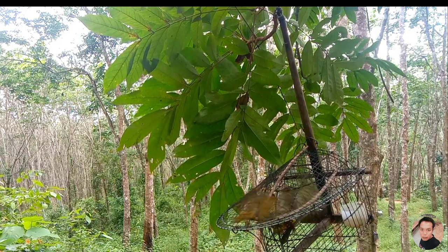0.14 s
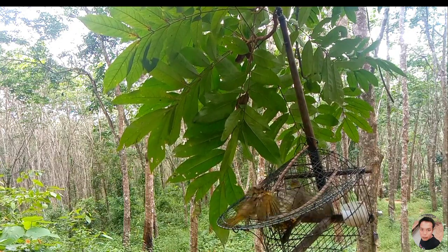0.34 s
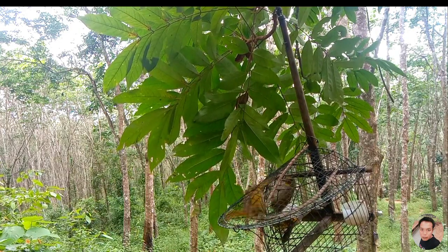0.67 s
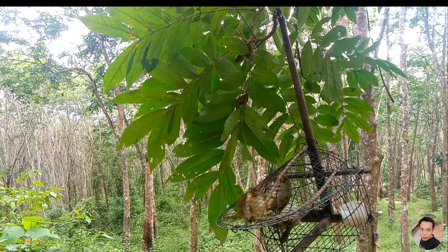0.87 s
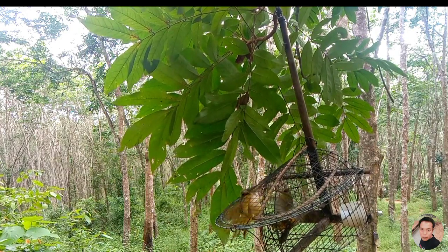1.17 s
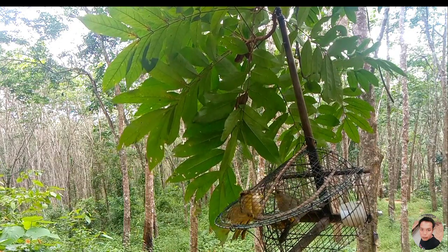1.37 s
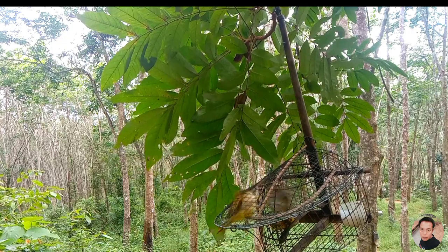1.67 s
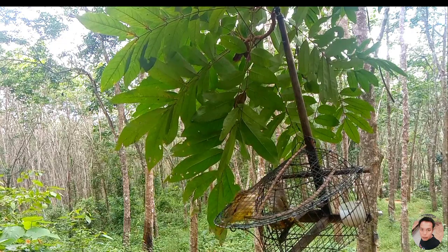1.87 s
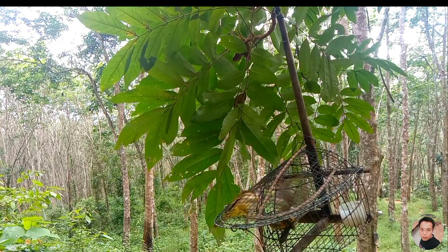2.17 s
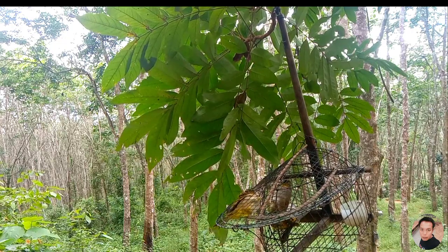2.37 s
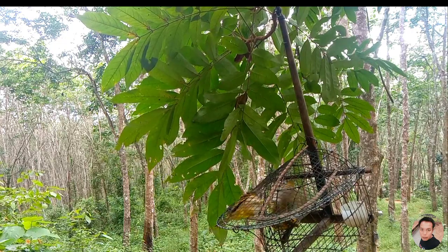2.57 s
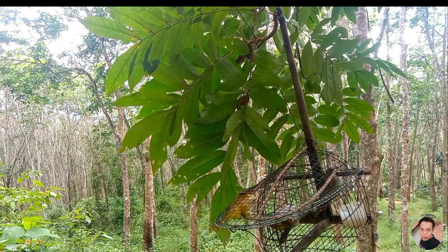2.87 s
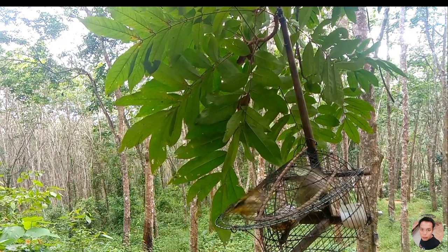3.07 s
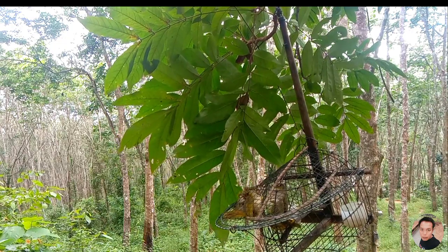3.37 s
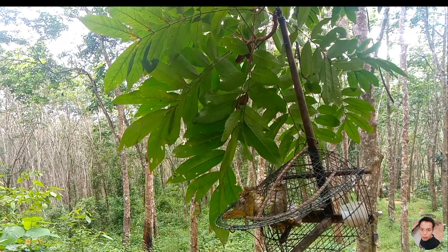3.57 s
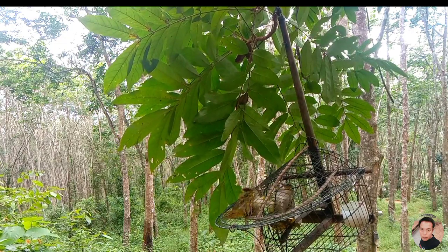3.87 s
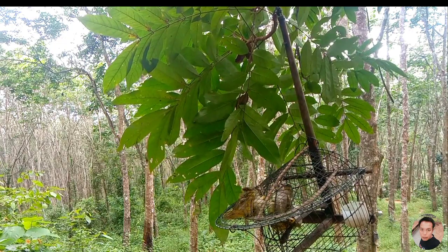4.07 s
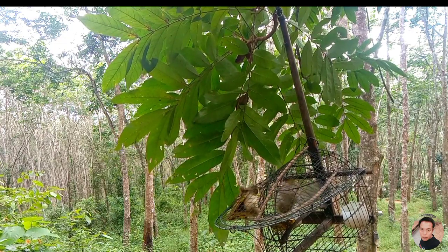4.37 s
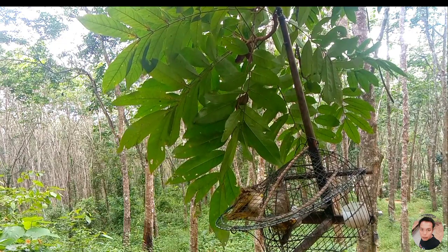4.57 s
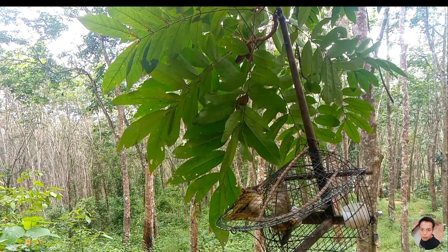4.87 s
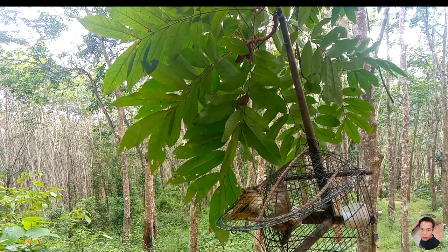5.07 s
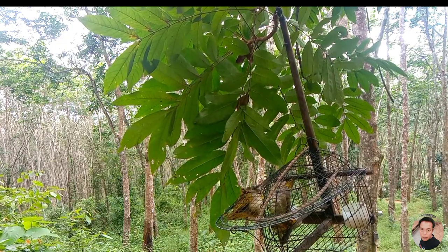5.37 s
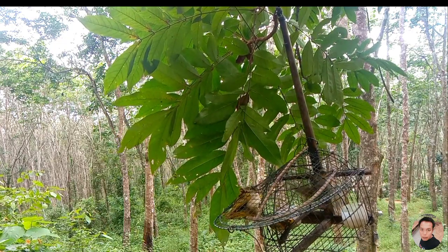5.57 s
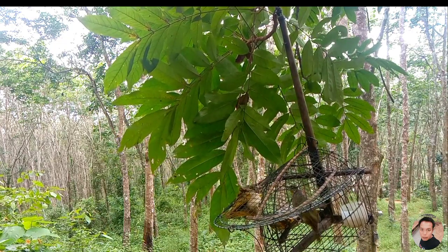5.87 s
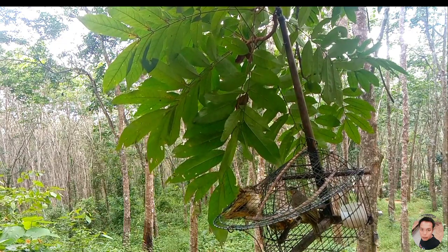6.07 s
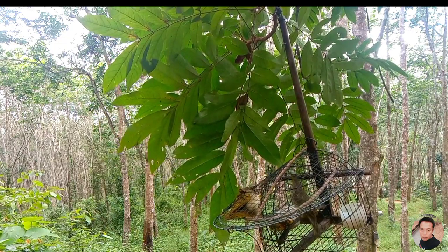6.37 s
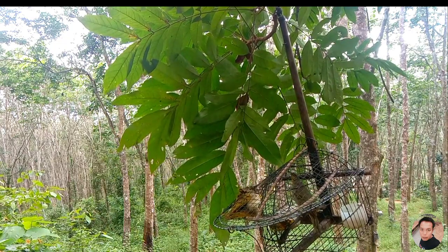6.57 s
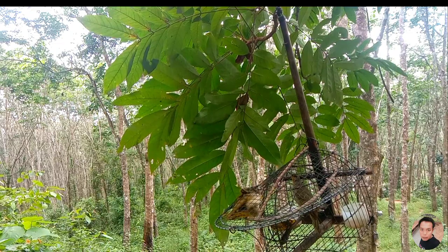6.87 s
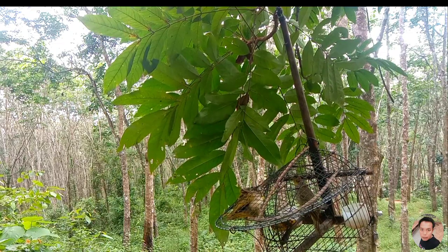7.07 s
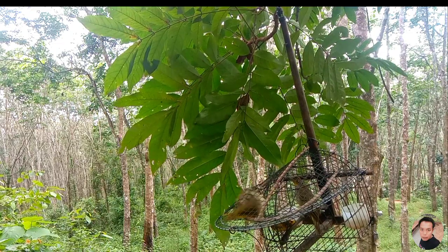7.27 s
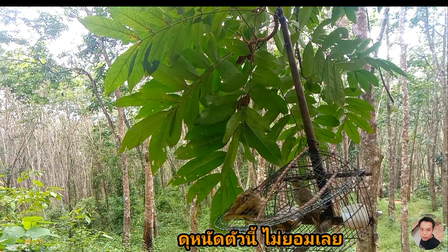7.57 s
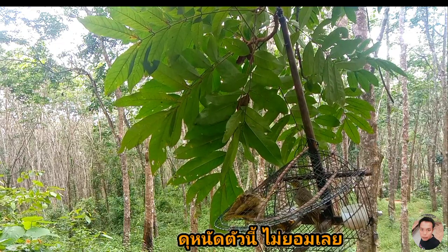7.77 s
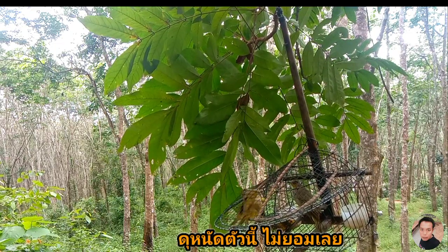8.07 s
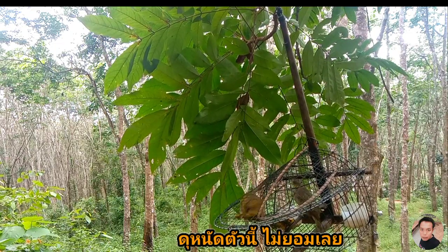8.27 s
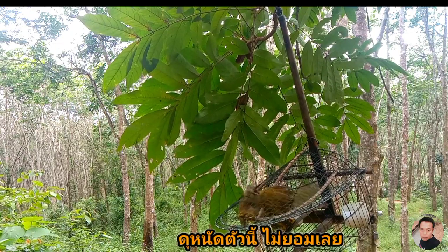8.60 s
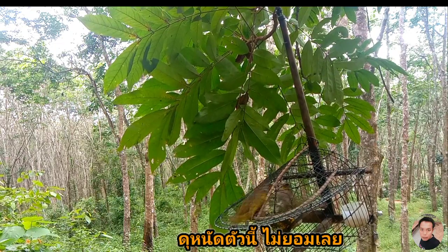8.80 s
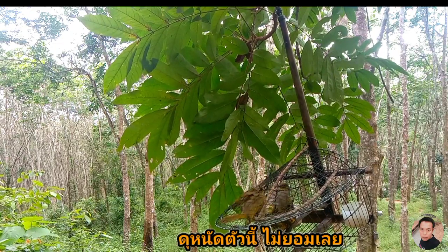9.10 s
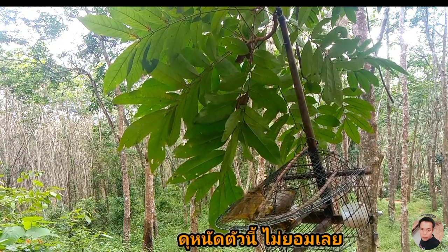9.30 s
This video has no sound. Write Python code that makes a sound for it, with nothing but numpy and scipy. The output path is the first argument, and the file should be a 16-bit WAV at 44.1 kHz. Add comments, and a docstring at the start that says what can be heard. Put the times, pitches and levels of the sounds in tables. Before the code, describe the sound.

Wings batter cage wire in fast dry flurries with clicks and tiny rings, starting at once and breaking into shorter bouts over several seconds. Behind is a quiet wood: steady soft air, a far engine humming low and surging, a steady high cricket, hoarse cicadas coming and going, and a distant hollow two-note bird. After a long lull, another brief scuffle rattles the cage and fades. Single-channel outdoor pickup, cage in front, little reverberation.

```python
"""Wings beat the wire of a cage in gritty bursts and feathers rustle as two birds scuffle in a wood.
Shaped noise makes the feathers; clicks driving damped modes make the wire ring.
Behind them a far engine drones in harmonics, a cricket trills in tone pulses, cicadas buzz as a comb
of lines and as hoarse noise bands, thin insects whistle as narrow-band noise, faint hollow tones flicker
and a distant bird repeats a two-note call of falling sines over the steady air of the wood."""
import sys
import numpy as np
from scipy import signal
from scipy.fft import rfft, irfft
from scipy.io import wavfile

SR = 44100
rng = np.random.default_rng(int(sys.argv[2]) if len(sys.argv) > 2 else 0)


def materialize(psi):
    """Save the field psi as 16-bit PCM at rate SR to the path in sys.argv[1].

    A 1-D psi becomes a single channel; in a 2-D psi each row is a channel.
    """
    bounded = np.clip(np.atleast_2d(psi).T, -1, 1)
    quanta = np.round(bounded * 32767).astype(np.int16)
    wavfile.write(sys.argv[1], SR, quanta)


N = 416304


def from_db(db):
    """Amplitude ratio: 20 dB is a factor of ten."""
    return 10 ** (np.asarray(db) / 20)


def rms_one(x):
    """Normalisation by effective value: the signal is scaled to rms 1."""
    return x / np.sqrt(np.mean(x ** 2) + 1e-20)


def in_time(rows):
    """Linear interpolation: each column after the times in seconds becomes one value a sample."""
    s, *columns = np.transpose(rows)
    return [np.interp(np.arange(N) / SR, s, c) for c in columns]


def coloured(x, spectrum):
    """Minimum-phase filtering: a folded cepstrum gives the spectrum its most compact causal response."""
    hz = np.maximum(np.arange(2049) * SR / 4096, 10)
    at, level_db = np.transpose(spectrum)
    log_gain = np.log(from_db(np.interp(np.log(hz), np.log(at), level_db)))
    cepstrum = irfft(log_gain)
    cepstrum[1:2048] *= 2
    cepstrum[2049:] = 0
    response = irfft(np.exp(rfft(cepstrum)))
    return signal.oaconvolve(x, response)[:N]


def drift(rate_hz):
    """Low-passed chance: two equal poles leave a random wander below the rate, with rms 1."""
    r = np.exp(-2 * np.pi * rate_hz / SR)
    wander = signal.lfilter([1], [1, -2 * r, r * r], rng.standard_normal(N + SR))
    return rms_one(wander[SR:])   # the filter has settled after the first second


def resonance(x, hz, width_hz):
    """Damped resonance: a two-pole band-pass with gain 1 on top."""
    r = np.exp(-np.pi * width_hz / SR)
    zeros = np.array([1, 0, -1]) * (1 - r * r) / 2
    return signal.lfilter(zeros, [1, -2 * r * np.cos(2 * np.pi * hz / SR), r * r], x + 1e-18)


def feather_noise(grit_db):
    """Modulated noise: hiss gritty by the millisecond, in low, middle and treble groups of patchy bands."""
    # Spectrum of the wings. Each row: frequency in Hz, relative level in dB per Hz.
    wing_spectrum = [(60, -18.5), (120, -5.5), (212, -2), (520, 1), (1080, -13), (1270, -1), (2760, -8.5),
                     (3390, -4.5), (4240, -11), (5520, 2), (8130, -3.5), (9380, -5), (13500, -17),
                     (14700, -14.5), (15600, -29)]
    edges_hz = [60, 250, 500, 950, 1450, 2000, 2700, 3500, 4500, 5400, 6400, 7400, 8400, 10000, 12500, 17000]
    patchy_db = 3.5
    grit = from_db(grit_db * drift(370))
    hiss = [coloured(grit * rng.standard_normal(N), wing_spectrum) for _ in range(2)]
    bands = []
    for k, pair in enumerate(zip(edges_hz, edges_hz[1:])):
        band_pass = signal.butter(2, pair, "band", fs=SR, output="sos")
        band = signal.sosfilt(band_pass, hiss[k % 2])   # neighbours take different hiss
        bands.append(from_db(patchy_db * drift(21.7)) * band)
    groups = bands[:3], bands[3:8], bands[8:]
    return np.array([rms_one(sum(group)) for group in groups])


def rustle():
    """Friction noise of feathers: soft patches between the beats; the softer, the duller."""
    # Feathers brushing. Each row: time in seconds, treble level in dB.
    brushing = [(0.0, -56), (0.4, -60), (0.47, -53), (0.63, -57), (0.89, -59), (1.13, -73), (1.29, -56.5),
                (1.52, -68), (1.81, -75), (2.1, -69), (2.39, -76.5), (3.23, -73.5), (3.39, -75.5),
                (5.39, -85), (5.81, -63), (6.02, -80.5), (8.55, -79), (8.7, -69), (9.1, -74), (9.44, -72.5)]
    loud_db, middle_db_when_loud, low_over_treble_db = -56, 3.5, 2
    dulling = 0.19   # dB the middle gains over the treble for each dB of softening
    treble_db, = in_time(brushing)
    middle_db = treble_db + middle_db_when_loud + dulling * (loud_db - treble_db)
    levels = from_db([treble_db + low_over_treble_db, middle_db, treble_db])
    return (levels * feather_noise(grit_db=0.5)).sum(axis=0)


def wing_beats():
    """Impact and friction: each beat swells into a burst of feather noise and rattles the wire with ticks."""
    # Beats on the wire. Each row: peak time in seconds, middle level in dB, low level in dB re middle,
    # treble level in dB re middle, rise in seconds, 60 dB decay time in seconds.
    beats = [(0.026, -52, -9, 6.5, 0.016, 0.03), (0.079, -41.5, -3.5, 0.5, 0.012, 0.036),
             (0.23, -35.5, -15, 2, 0.0076, 0.052), (0.256, -38, -8, 1, 0.011, 0.083),
             (0.311, -40, -4.5, 2, 0.021, 0.12), (0.375, -42.5, -6, 3, 0.011, 0.054),
             (0.44, -35, -7.5, -4, 0.014, 0.043), (0.486, -34.5, -8, -5, 0.021, 0.033),
             (0.545, -32.5, -10, 0, 0.01, 0.031), (0.601, -31.5, -1.5, -3, 0.013, 0.024),
             (0.649, -33.5, -36, -2, 0.015, 0.057), (0.693, -40, -2, -2.5, 0.015, 0.051),
             (0.79, -68, -10, 18.5, 0.0049, 0.11), (0.851, -37, 1, -2.5, 0.0022, 0.024),
             (0.884, -46.5, -15, 4, 0.011, 0.077), (0.93, -52, -22, 2.5, 0.0073, 0.11),
             (1.105, -46.5, -22, -0.5, 0.046, 0.054), (1.118, -35, -15, -2, 0.0064, 0.043),
             (1.14, -32.5, -7.5, -1.5, 0.0041, 0.037), (1.162, -43.5, -11, 1, 0.012, 0.19),
             (1.248, -38, -6, 5.5, 0.024, 0.053), (1.28, -39.5, -24, 1, 0.0098, 0.037),
             (1.334, -31, -7, 1, 0.017, 0.03), (1.343, -33, 1, 1, 0.005, 0.035),
             (1.376, -30, -4, 0.5, 0.013, 0.083), (1.433, -36.5, -8, 1, 0.02, 0.083),
             (1.478, -33.5, -26, 0.5, 0.011, 0.042), (1.619, -50, -27, -2.5, 0.033, 0.13),
             (1.744, -53.5, -15, 1.5, 0.0029, 0.082), (1.8, -37.5, -9, 2, 0.017, 0.052),
             (2.041, -57, -24, 1, 0.038, 0.073), (2.108, -53.5, -22, 9, 0.0042, 0.066),
             (2.24, -49.5, -2.5, 0.5, 0.0056, 0.16), (2.288, -40, -1, 2, 0.015, 0.074),
             (2.372, -52.5, -9, -5, 0.024, 0.13), (2.734, -46, -4, -1.5, 0.0047, 0.071),
             (2.802, -37, -2, 1, 0.0052, 0.11), (2.849, -32.5, -8, -3.5, 0.005, 0.054),
             (2.905, -36, -4.5, -1.5, 0.016, 0.041), (3.079, -76.5, -9, 11.5, 0.0044, 0.34),
             (3.185, -36.5, -11, -0.5, 0.013, 0.069), (3.242, -36, -6, 1.5, 0.015, 0.08),
             (3.282, -26, -1, -1, 0.0045, 0.032), (3.307, -44, -13, 3, 0.013, 0.058),
             (3.34, -40, -15, 2.5, 0.02, 0.073), (3.814, -57.5, -13, -16, 0.0066, 0.087),
             (3.942, -62.5, -14, -3, 0.017, 0.2), (4.388, -62, -9, 7, 0.012, 0.18),
             (4.441, -41.5, -5, -1.5, 0.019, 0.044), (4.509, -40, -5, 2.5, 0.0057, 0.086),
             (5.623, -57, 0, 5, 0.0029, 0.071), (5.68, -55, -2.5, -6, 0.024, 0.1),
             (5.71, -38, -6, 1.5, 0.0044, 0.053), (5.782, -43.5, -24, 1, 0.0057, 0.032),
             (5.797, -38.5, -3, 5.5, 0.0033, 0.04), (5.872, -56.5, -25, -1, 0.0023, 0.056),
             (5.95, -59, -32, 0.5, 0.0026, 0.044), (6.577, -74, -23, 4, 0.05, 0.13),
             (7.454, -69, 0, 2.5, 0.048, 0.14), (7.529, -66, -5, 1, 0.0033, 0.063),
             (8.311, -61.5, -19, 1.5, 0.013, 0.16), (8.388, -65.5, -16, -3, 0.0038, 0.2),
             (8.55, -37.5, 3.5, 0, 0.0049, 0.024), (8.565, -37.5, -1, 0.5, 0.0093, 0.068),
             (8.618, -50, -4, 1, 0.023, 0.035), (8.641, -45, -3, 2, 0.019, 0.032),
             (8.655, -42.5, -4.5, -2, 0.014, 0.057), (8.701, -39.5, -8, -0.5, 0.015, 0.04),
             (8.774, -43, -8, -2.5, 0.011, 0.095), (8.832, -46.5, 0, -1, 0.028, 0.033),
             (8.835, -37.5, -12, 2, 0.0043, 0.041), (8.871, -52, -2, -4, 0.0036, 0.062),
             (8.946, -48.5, -28, -4, 0.0064, 0.096), (9.04, -58.5, -15, -7, 0.034, 0.16),
             (9.066, -51.5, -27, -15, 0.0042, 0.02), (9.114, -56, -15, -3, 0.0047, 0.094),
             (9.274, -56.5, -16, -5.5, 0.032, 0.096), (9.296, -66.5, -3, 9, 0.0074, 0.057)]
    # The clearest ticks of claws and quills on the wire. Each row: peak time in seconds, click level in dB,
    # frequency in Hz near which the wire rings most.
    ticks = [(0.029, -35, 1940), (0.0797, -27, 1260), (0.234, -14, 1520), (0.259, -19, 3400),
             (0.311, -22, 1900), (0.374, -31, 1910), (0.438, -30, 3710), (0.468, -17.5, 5400),
             (0.486, -14, 1300), (0.5417, -23, 1740), (0.5478, -14, 1290), (0.6018, -16.5, 1260),
             (0.649, -18.5, 1650), (0.6919, -18.5, 1480), (0.852, -13, 3990), (0.929, -22, 5620),
             (1.1191, -20.5, 1940), (1.1402, -10.5, 1260), (1.236, -25, 3670), (1.2437, -19, 1780),
             (1.2814, -38, 1710), (1.326, -28, 1750), (1.3458, -16, 3400), (1.3734, -14, 1760),
             (1.3965, -22, 7000), (1.4341, -20, 1640), (1.4809, -17.5, 3860), (1.6203, -37, 2280),
             (1.7468, -39, 2330), (1.801, -20, 1340), (2.108, -31.5, 5360), (2.2423, -36, 2360),
             (2.2911, -20, 1660), (2.7353, -22.5, 1690), (2.7994, -22.5, 1910), (2.8514, -11, 1280),
             (2.901, -29, 1700), (3.1856, -22.5, 1520), (3.242, -20, 5400), (3.281, -5, 1270),
             (3.3494, -28, 5400), (3.8154, -37, 2650), (3.9402, -40, 1910), (4.4428, -21, 1260),
             (4.508, -16.5, 1305), (5.621, -44, 5570), (5.7076, -18, 1640), (5.7755, -29, 7000),
             (5.7813, -23, 1290), (5.7963, -22.5, 5400), (5.871, -36.5, 1700), (5.9465, -37.5, 2300),
             (8.5194, -37.5, 5790), (8.5496, -10.5, 1260), (8.5636, -25, 5400), (8.641, -25, 1280),
             (8.6925, -19.5, 1260), (8.7742, -25.5, 1680), (8.8182, -26, 1490), (8.8364, -16.5, 1860),
             (8.9462, -42, 2220), (9.067, -45, 1880), (9.1135, -33, 2960), (9.2953, -37, 3400)]
    loose_per_s, loose_db = 230, -3   # small ticks within a beat
    power, t = np.zeros((3, N)), np.arange(N) / SR
    for s, middle_db, low_db, treble_db, rise, t60 in beats:
        span = slice(max(round((s - rise) * SR), 0), round((s + 0.22) * SR))
        late = t[span] - s
        swell = np.cos(np.pi / 2 * np.clip(late / rise, -1, 0)) ** 1.3
        decay = from_db(-60 * (np.maximum(late, 0) / t60) ** 1.49)
        group_db = middle_db + np.array([[low_db], [0], [treble_db]])
        power[:, span] += (from_db(group_db) * swell * decay) ** 2
    envelope = np.sqrt(power)
    loose_sizes = from_db(5.2 * np.minimum(rng.exponential(1, N), 4)) * rng.choice([-1, 1], N)
    loose = loose_sizes * (rng.random(N) < loose_per_s / SR)
    clicks = from_db(loose_db) * envelope[1] * loose
    favoured_hz = 1200 * 2 ** rng.uniform(0, 2.8, N)
    for s, click_db, hz in ticks:
        i = round((s - .0003) * SR)   # the click comes just ahead of the peak
        clicks[i], favoured_hz[i] = from_db(click_db), hz
    feathers = feather_noise(grit_db=2.8)
    return (envelope * feathers).sum(axis=0) + wire(clicks, favoured_hz)


def wire(clicks, favoured_hz):
    """Modal synthesis: a click cracks and rings one of three bars, most in modes near its favoured pitch."""
    # Short rings of the cage wire. Each row: frequency in Hz before a bar's tuning,
    # level in dB before chance and loss, 60 dB decay time in seconds.
    modes = [(430, 1.5, 0.016), (836, -15, 0.036), (1262, -13, 0.044), (1760, -4.5, 0.021),
             (1980, -1.5, 0.012), (2300, -4, 0.014), (3490, -6.5, 0.015), (3800, -7, 0.022),
             (5420, 1.5, 0.0042), (5260, -7, 0.0089), (7200, 1.5, 0.0076), (9400, -9, 0.017),
             (10800, -8.5, 0.03)]
    off_pitch_db_per_octave = 13   # loss of modes far from the favoured pitch
    crack_spectrum = [(300, -16.0), (1500, -16), (3500, 5), (7000, 1), (15000, -20)]   # (Hz, dB)
    out = from_db(-10) * coloured(clicks, crack_spectrum)
    at = np.flatnonzero(clicks)
    draws = rng.normal(0, 1, (len(at), len(modes) + 1))
    bar = np.digitize(draws[:, -1], [-.43, .43])   # three about equally likely bars
    for (hz, db, t60), chance in zip(modes, draws.T):
        loss_db = off_pitch_db_per_octave * np.abs(np.log2(hz / favoured_hz[at]))
        strength = clicks[at] * from_db(db - 8.5 + 3.7 * np.minimum(chance, 1) - loss_db)
        for k, tuning in enumerate([.97, 1, 1.04]):
            struck = np.zeros(N)
            struck[at] = (bar == k) * strength
            r, w = from_db(-60 / (t60 * SR)), 2 * np.pi * hz * tuning / SR
            out += signal.lfilter([0, np.sin(w)], [1, -2 * r * np.cos(w), r * r], struck + 1e-18)
    return out


def engine():
    """Harmonic synthesis: low orders of the firing cycle, each swelling with load and wavering by itself."""
    # Light running. Each row: time in seconds, cycle frequency in Hz, load level in dB between surges.
    light_running = [(0.0, 32.8, -48), (0.23, 30.87, -57), (1.0, 31.76, -49.5), (1.37, 30.86, -54),
                     (1.57, 32.05, -68), (2.39, 31.65, -56.5), (2.6, 35.1, -59), (3.21, 34.34, -58.5),
                     (3.55, 36.1, -62), (4.13, 35.14, -63.5), (4.31, 36.3, -62.5), (4.57, 34.6, -65),
                     (6.78, 35.87, -62.5), (7.86, 35.7, -59.5), (8.47, 37.54, -69.5), (8.57, 35.9, -60.5),
                     (9.25, 37.7, -70.5), (9.44, 37.7, -64)]
    # Surges under load, swelling slowly and cut off short. Each row: start in seconds, end in seconds,
    # load level in dB before the rise and fade.
    surges = [(0.073, 1.03, -43.5), (1.02, 1.7, -44), (1.775, 2.13, -46.5), (2.203, 2.441, -41),
              (3.102, 3.36, -48.5), (4.79, 5.05, -47.5), (5.305, 5.503, -54), (6.05, 6.25, -54),
              (6.804, 7.083, -48.5), (7.1, 8.054, -59), (8.55, 8.837, -66)]
    # Each row: order, level in dB at the light load, share of the swell under load, unsteadiness in dB.
    orders = [(2, -69, 0.039, 5), (3, -61, 1.0, 2), (4, -66.5, 0.6, 2.5), (5, -76.5, 0.82, 2.5),
              (6, -92, 0.91, 7)]
    light_load_db = -62
    rise_s, cut_s, fade_db_per_s = 0.24, 0.051, 4
    hz, between_db = in_time(light_running)
    t, load = np.arange(N) / SR, from_db(between_db)
    for start, end, db in surges:
        gate = np.clip((t - start) / rise_s, 0, 1) * np.clip((end - t) / cut_s, 0, 1)
        load = np.hypot(load, gate * from_db(db - fade_db_per_s * (t - start)))
    phase = 2 * np.pi * np.cumsum(hz + 0.21 * drift(4.5)) / SR
    out = np.zeros(N)
    for k, db, share, unsteady_db in orders:
        level = np.sqrt(2) * from_db(db + unsteady_db * drift(8.0))   # rms to peak of a sine
        swell = (load / from_db(light_load_db)) ** share
        out += level * swell * np.sin(round(k) * phase + rng.uniform(0, 2 * np.pi))
    return out


def cricket(level_db, hz, per_s):
    """Pulsed tone: a steady train of short sine pulses; now and then one is much fainter."""
    faint_share, faint_gain = .045, .15
    at = np.arange(.0105, N / SR, 1 / per_s)
    sizes = from_db(rng.normal(0, 1.5, 700)[:len(at)])
    sizes[rng.random(700)[:len(at)] < faint_share] = faint_gain
    train = np.zeros(N)
    train[(at * SR).astype(int)] = sizes
    t = np.arange(round(0.014 * SR)) / SR
    pulse = np.hanning(len(t)) * np.sin(2 * np.pi * (hz * t - 9000 * t * t))   # the pitch sags in each pulse
    return from_db(level_db) * rms_one(signal.oaconvolve(train, pulse)[:N])


def cicada_chorus():
    """Incoherent sum: many far insects blur to two hoarse noise bands of drifting resonant strands."""
    # Far chorus. Each row: time in seconds, low-band level in dB, high-band level in dB.
    band_levels = [(0, -68, -66), (2.0, -73, -85), (3.5, -75, -84), (3.7, -75, -86.5), (5.5, -70, -74),
                   (5.8, -63.5, -63), (6.3, -69.5, -90), (6.499, -79, -93), (6.95, -76, -70),
                   (7.2, -73, -80), (8.4, -78.5, -86), (8.9, -65, -63), (9.44, -79, -92)]
    wavering_db, spread_hz, strand_width_hz = 2, 700, 280
    out = np.zeros(N)
    for band_db, hz in zip(in_time(band_levels), (4300, 5400)):
        white = rng.standard_normal(N)
        strands = np.zeros(N)
        for step in (-0.39, -0.012, 0.126, 0.634):
            strand_hz = hz + step * spread_hz
            strand = resonance(resonance(white, strand_hz, strand_width_hz), strand_hz, strand_width_hz)
            strands += from_db(2.8 * drift(4.0)) * strand
        out += from_db(band_db + wavering_db * drift(8.3)) * rms_one(strands)
    return out


def air():
    """Broadband background: steady coloured noise of the wood, its level wandering slightly."""
    # The wood's steady air. Each row: frequency in Hz, relative level in dB per Hz.
    air_spectrum = [(25, -8), (52, -20.5), (110, -9.5), (253, -16.5), (950, -21.5), (2570, -30),
                    (4400, -39.5), (6240, -49.5), (7600, -21.5), (8400, -32), (9400, -31.5), (11000, -42.5),
                    (12000, -45), (13800, -53), (15600, -56)]
    level_db = -67.5 + 0.29 * drift(15.0)
    return from_db(level_db) * rms_one(coloured(rng.standard_normal(N), air_spectrum))


def hollow_tones():
    """Narrow-band noise: white noise in resonances gives faint hollow tones that flicker."""
    # Each row: start in seconds, end in seconds, frequency in Hz, width in Hz of each of two
    # resonances in series, level in dB, flicker in dB.
    tones = [(1.5, 9.44, 1262, 91, -81, 4.5), (8.9, 9.44, 450, 259, -66.5, 7)]
    t, out = np.arange(N) / SR, np.zeros(N)
    for start, end, hz, width_hz, db, flicker_db in tones:
        tone = rms_one(resonance(resonance(rng.standard_normal(N), hz, width_hz), hz, width_hz))
        out += (t > start) * (t < end) * from_db(db + flicker_db * drift(3.4)) * tone
    return out


def whistles():
    """Narrow-band noise: sharp resonances give thin wavering insect tones that swell and stop."""
    # Each row: start in seconds, end in seconds, frequency in Hz, level in dB.
    insect_tones = [(1.905, 2.419, 7260, -73), (2.909, 3.45, 7200, -75), (3.862, 4.399, 7140, -77),
                    (4.272, 4.36, 9520, -72), (4.775, 5.332, 7120, -76), (5.19, 5.273, 9500, -77),
                    (5.851, 6.288, 7150, -72.5), (6.357, 6.604, 7020, -78), (6.62, 7.105, 7080, -72.5),
                    (7.504, 7.999, 7210, -73), (8.501, 9, 7430, -66)]
    out, t = np.zeros(N), np.arange(N) / SR
    white = rng.standard_normal(N)
    for start, end, hz, db in insect_tones:
        gate = np.clip((t - start) / 0.02, 0, 1) * np.clip((end - t) / 0.073, 0, 1)
        out += from_db(db) * gate * rms_one(resonance(resonance(white, hz, 45), hz, 150))
    return out


def near_cicada():
    """Periodic clicks as a line comb: body resonances weight the lines, leaves make each fade by itself."""
    # Phrases that slow down. Each row: start in seconds, end in seconds, clicks per second at the start,
    # slowing in clicks per second each second.
    phrases = [(2.05, 3.6, 153.7, 3.4), (6.9, 8.95, 156.8, 4.45)]
    level_db, swell_s, stop_s, fade_db_per_s = -67, .3, 0.22, 4
    fading_db = 4   # spread of each line's own level
    t, per_s, gate, out = np.arange(N) / SR, np.zeros(N), np.zeros(N), np.zeros(N)
    for start, end, first_per_s, slowing in phrases:
        late = (t - start) * (t > start) * (t < end)
        per_s += (late > 0) * (first_per_s - slowing * late)
        swell = np.clip(late / swell_s, 0, 1) * np.clip((end - t) / stop_s, 0, 1)
        gate += swell * from_db(level_db - fade_db_per_s * late)
    phase = 2 * np.pi * np.cumsum(per_s) / SR
    body_hz = 4370 + 40 * drift(1.0)
    for k in range(24, 39):   # harmonics of the click rate
        main = 1 / (1 + ((k * per_s - body_hz) / 300) ** 4)
        upper = from_db(-16.5) / (1 + ((k * per_s - 5500) / 300) ** 4)
        line = np.sin(k * phase + rng.uniform(0, 2 * np.pi))
        out += (main + upper) * from_db(fading_db * drift(10.0)) * line
    return out * gate


def far_bird():
    """Frequency-swept sines: a high then a low hollow note, each a soft burst falling a little."""
    # Distant calls. Each row: time of the first note's middle in seconds, level in dB.
    calls = [(3.84, -62.5), (4.37, -62), (4.665, -61.5), (5.06, -63.5), (5.53, -59.5), (6.04, -62.5),
             (6.36, -65), (6.79, -64), (7.06, -68), (7.575, -65.5), (7.885, -71), (8.285, -65.5)]
    # The two notes. Each row: delay in seconds, start frequency in Hz, level in dB re call, length in seconds.
    notes = [(0, 850, -4, .04), (.03, 690, 0, .055)]
    out = np.zeros(N)
    for s, level_db in calls:
        for delay, hz, db, length in notes:
            t = np.arange(round(length * SR)) / SR
            i = round((s + delay - length / 2) * SR)
            note = np.hanning(len(t)) * np.sin(2 * np.pi * (hz * t - 700 * t * t))
            out[i:i + len(t)] += from_db(level_db + db) * note
    return out


def trunks(x, level_db, t60):
    """Multiple scattering: leaves and trunks add a short, dull, dense tail of decaying noise."""
    t = np.arange(round(t60 * SR)) / SR
    tail = rng.standard_normal(len(t)) * from_db(-60 * t / t60) * np.clip(t / 0.03, 0, 1)
    tail = signal.lfilter([1], [1, -.5], tail)   # dulls the treble
    tail = tail / np.sqrt(np.sum(tail ** 2))
    return x + from_db(level_db) * signal.oaconvolve(x, tail)[:N]


def scene():
    """Superposition: the cage in front and the wood behind add linearly to one channel."""
    cage = rustle() + trunks(wing_beats(), level_db=-17.5, t60=0.14)
    insects = cricket(level_db=-68.5, hz=7997, per_s=62.65) + cicada_chorus() + whistles() + near_cicada()
    bird = trunks(far_bird(), level_db=-24.0, t60=0.49)
    return (cage + engine() + insects + air() + hollow_tones() + bird)[None]


def record(dry):
    """Linear filtering: the microphone's housing adds peaks and dips; deep bass and top are cut."""
    # Each row: frequency in Hz, width in Hz, gain in dB.
    housing_peaks = [(1254, 44, 5), (15250, 370, 21), (6210, 500, -14.5), (8197, 1480, -12)]
    for hz, width_hz, db in housing_peaks:
        dry = dry + (from_db(db) - 1) * resonance(dry, hz, width_hz)
    dry = signal.sosfilt(signal.butter(2, 50, "high", fs=SR, output="sos"), dry)
    edge = signal.ellip(10, .5, 32, 15500, fs=SR, output="sos")   # steep cutoff
    beyond = signal.cheby2(12, 50, 16800, fs=SR, output="sos")   # deeper loss above it
    return signal.sosfilt(np.vstack([edge, beyond]), dry)


dry = scene()
out = record(dry)
materialize(out)
```